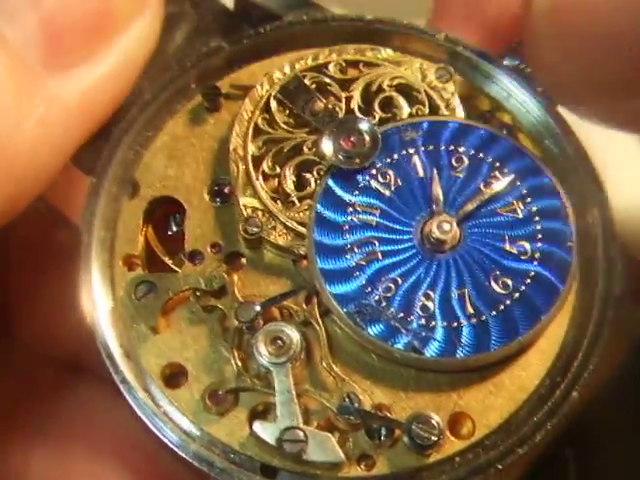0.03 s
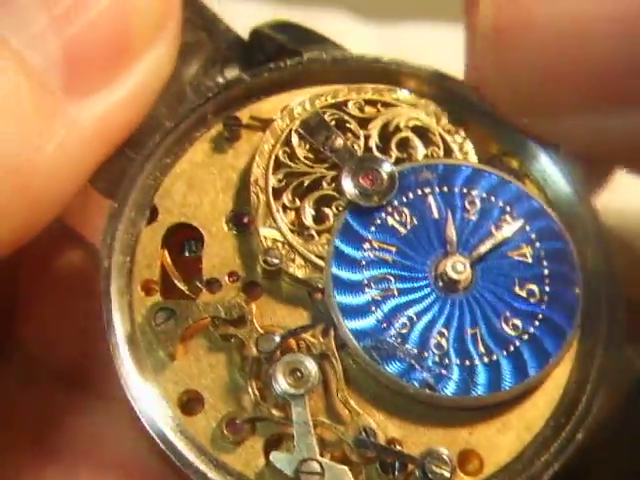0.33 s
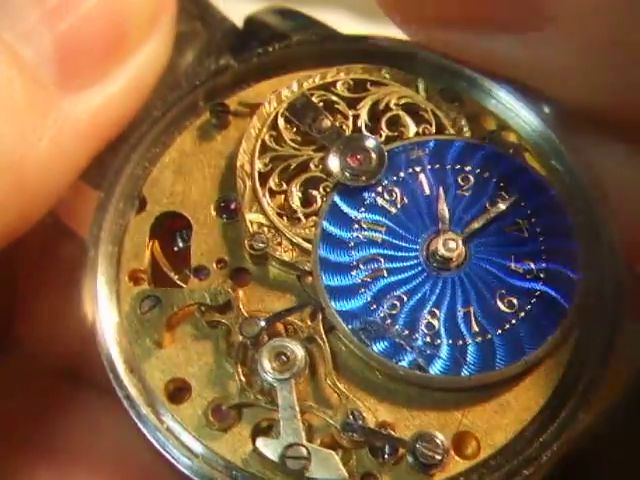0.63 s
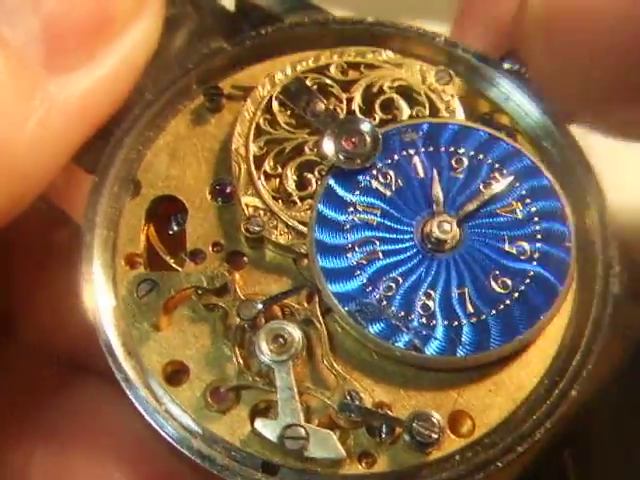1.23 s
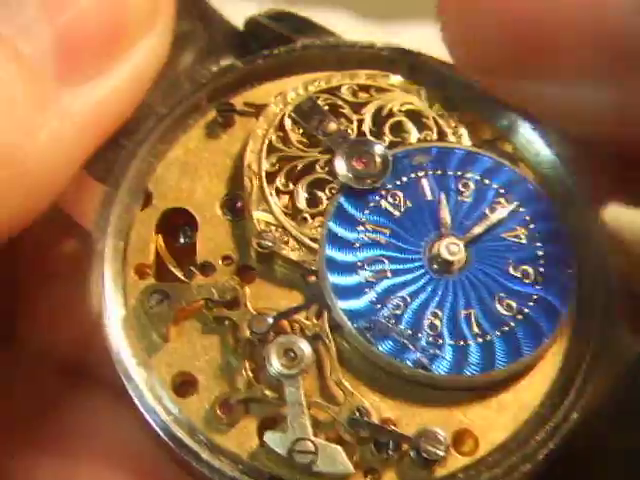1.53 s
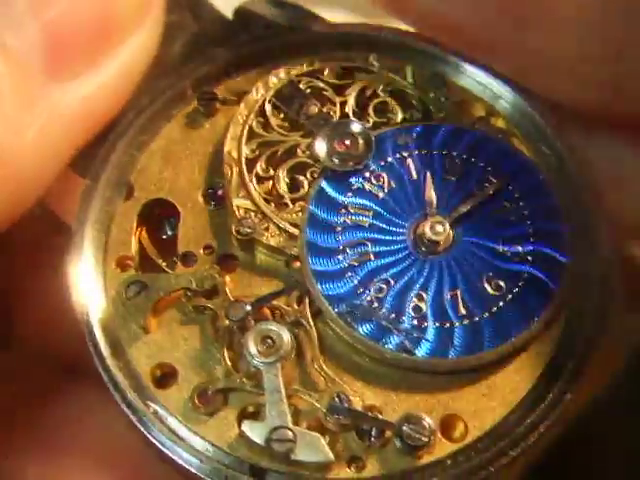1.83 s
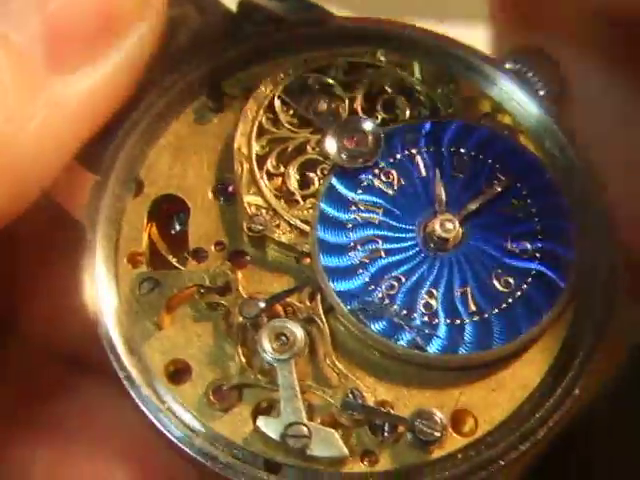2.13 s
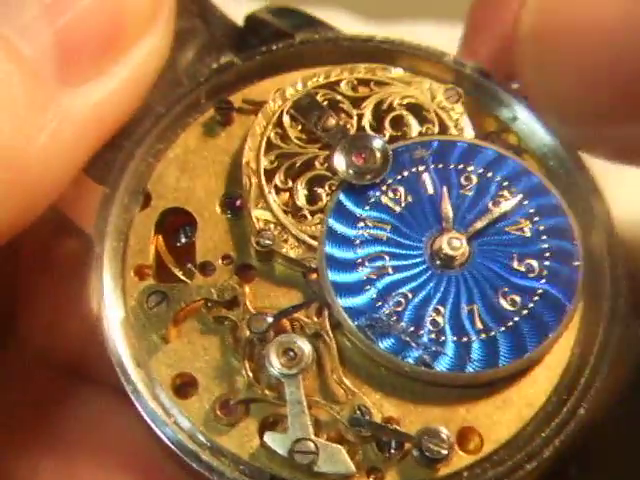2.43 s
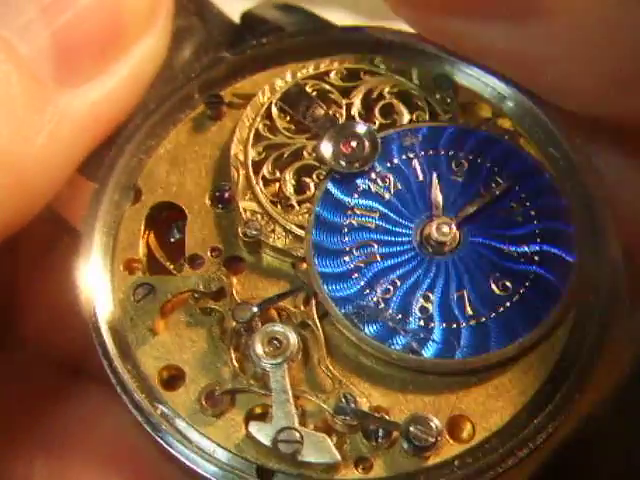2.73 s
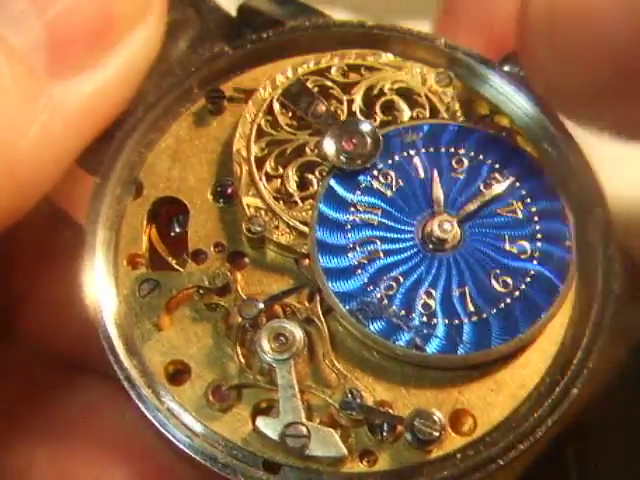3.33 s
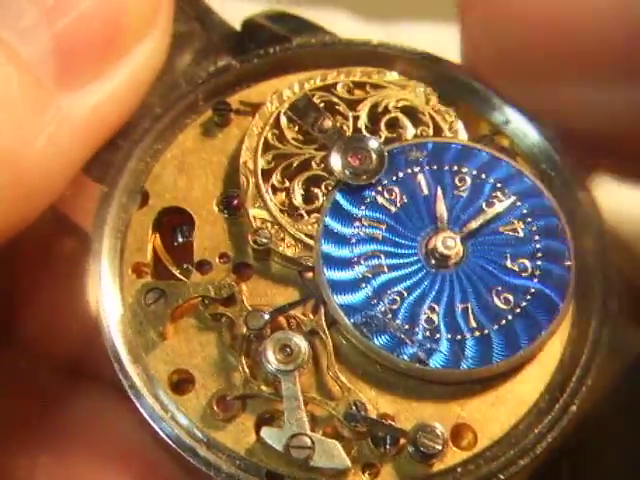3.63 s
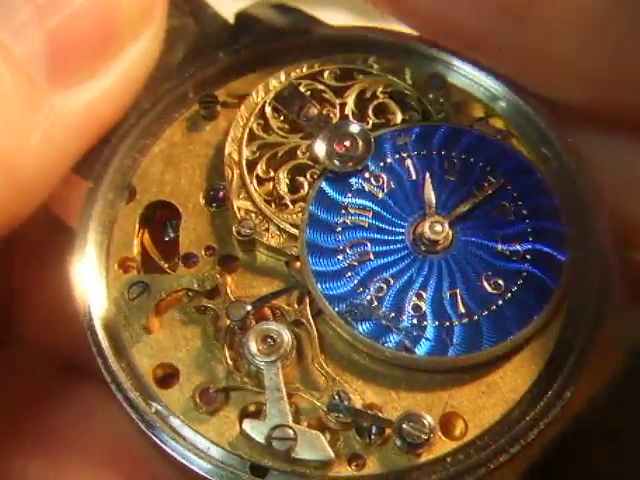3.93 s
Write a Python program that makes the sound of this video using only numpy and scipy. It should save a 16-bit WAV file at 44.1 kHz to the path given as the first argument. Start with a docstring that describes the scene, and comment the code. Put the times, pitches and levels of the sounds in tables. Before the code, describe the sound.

A watch is wound by hand, close to the microphone in a quiet room. Four bursts of quick, bright metal clicks come with short pauses, and one dry snap follows the third. A faint gritty hiss lies underneath.

```python
"""Winding a watch, close up

A quiet room, the watch close to the microphone. Four turns of the crown drag the pawl over the ratchet
wheel, each tooth a short metal click that rings movement and case. The crown swishes back before the
first two turns, and a finger rubs softly between them; the pawl snaps home faintly after the second,
clearly after the third. The room hums and rumbles, and the recorder's coarse steps add a gritty hiss."""
import sys
import numpy as np
from scipy import signal
from scipy.fft import rfft, irfft, next_fast_len
from scipy.io import wavfile
from scipy.ndimage import map_coordinates

SR = 44100
rng = np.random.default_rng(int(sys.argv[2]) if len(sys.argv) > 2 else 0)


def digitize_waveform(pressure):
    """Quantize a signal to 16-bit integers and store it at the path in sys.argv[1].

    Rows of a 2-D input are taken as channels; values are limited to [-1, 1].
    """
    field = np.atleast_2d(pressure).T
    bounded = np.clip(field, -1, 1)
    quanta = np.round(bounded * 32767).astype(np.int16)
    wavfile.write(sys.argv[1], SR, quanta)


N = 176400  # 4 s
ATTACK_S = 0.0008  # rise of a metal contact


def amp(db):
    """Decibels to gain."""
    return 10 ** (np.asarray(db) / 20)


def unit(x):
    """Scale to rms 1."""
    return x / np.sqrt(np.mean(x ** 2) + 1e-20)


def along(points, hz):
    """Read (Hz, value) points on a log frequency axis."""
    knots_hz, values = np.transpose(points)
    return np.interp(np.log(hz + 1), np.log(knots_hz + 1), values)


def filtered(x, response):
    """Filter x by a gain given as a function of Hz."""
    size = next_fast_len(len(x) + SR // 4)
    return irfft(rfft(x, size) * response(np.fft.rfftfreq(size, 1 / SR)), size)[:len(x)]


def noise(spectrum):
    """Noise of rms 1, coloured by (Hz, dB) points."""
    return unit(filtered(rng.standard_normal(N), lambda hz: amp(along(spectrum, hz))))


def wobble(rate):
    """A smooth random curve, rate knots a second."""
    return map_coordinates(rng.standard_normal(int(N * rate / SR) + 4), [np.arange(N) * rate / SR])


def rise(t):
    """The quick swell at the start of a contact."""
    return 1 - np.exp(-(t / ATTACK_S) ** 4)


def fade(t, t60):
    """Exponential decay by 60 dB in t60 seconds."""
    return np.exp(-np.log(1000) * t / t60)


def background():
    """Machine hum, a swelling, droning rumble and room air, with a soft finger rub near 1.3 s."""
    # Each row: frequency in Hz, rms level in dB (for the drone, relative to the rumble).
    hum_tones = [(15.5, -64), (31, -58.5), (46.5, -70), (71.6, -68.5), (77.4, -72.5), (120, -72.5),
                 (142.4, -71.5)]
    drone_tones = [(171, -3), (293, -10.5)]
    # Noise colours. Each row: frequency in Hz, relative density in dB.
    air_colour = [(20, -2), (35, -0.5), (60, -6), (110, -6.5), (200, -4.5), (350, -7.5), (700, -12),
                  (1300, -19), (2500, -22.5), (8500, -25), (10500, -60.5)]
    rumble_colour = [(60, -28.5), (130, -13), (172, -1.5), (215, -3), (290, 0), (380, -18), (800, -30.5)]
    # Swell and ebb. Each row: time in seconds, level in dB.
    air_and_finger_rub_levels = [(0, -54.5), (.8, -60), (1.3, -56), (2, -60), (3, -61), (4, -61.5)]
    rumble_levels = [(0, -75.5), (1.0, -72.5), (1.6, -70.5), (1.85, -64), (2.3, -60.5), (2.6, -59.5),
                     (2.85, -67.5), (3.0, -64), (3.2, -68), (3.5, -62.5), (4, -72.5)]
    waver_db = 3
    t = np.arange(N) / SR
    tone = lambda hz, db: amp(db) * np.sqrt(2) * np.sin(2 * np.pi * (hz * t + rng.random()))
    level = lambda curve: amp(np.interp(t, *np.transpose(curve)))
    hum = sum(tone(hz, db) for hz, db in hum_tones)
    air_and_rub = level(air_and_finger_rub_levels) * noise(air_colour)
    rumble = noise(rumble_colour)
    drone = sum(tone(hz, db + waver_db * wobble(rate=7)) for hz, db in drone_tones)
    return hum + level(rumble_levels) * (rumble + drone) + air_and_rub


def crown_slides():
    """A thin swish as the crown slides back under the fingertip."""
    # Each row: start in seconds, length in seconds, level at the crest in dB.
    slides = [(0.0, 0.38, -65.5), (1.194, 0.19, -72.5)]
    # Each row: frequency in Hz, relative density in dB.
    swish_colour = [(2000, -36), (6000, -2), (7000, -5), (7600, 6.5), (8500, -9), (10500, -60)]
    t = np.arange(N) / SR
    level = sum(amp(db) * np.sin(np.pi * np.clip((t - start) / length, 0, 1))
                for start, length, db in slides)
    return level * noise(swish_colour)


def ratchet():
    """Each tooth scrapes past the pawl, which falls, bounces and rings movement and case."""
    # Each row: start in seconds, level in dB before click_db, then the energy shares in dB
    # aimed at for the plate, middle and top bands.
    teeth = [(0.3538, -32.5, -14, -9, -6), (0.3894, -36.0, -10, -5, -13), (0.4472, -34.0, -13, -8, -9),
             (0.4797, -34.5, -11, -9, -10), (0.5136, -34.0, -12, -8, -11), (0.5566, -34.5, -11, -8, -8),
             (0.6029, -33.0, -13, -8, -7), (0.6539, -33.0, -15, -10, -8), (0.7111, -33.0, -17, -10, -14),
             (0.7702, -33.0, -16, -11, -17), (0.8216, -33.0, -18, -9, -9), (0.8621, -31.5, -17, -8, -7),
             (0.9178, -32.0, -18, -5, -13), (1.5317, -33.5, -19, -4, -13), (1.554, -32.5, -21, -6, -9),
             (1.5806, -33.5, -19, -8, -16), (1.6068, -33.5, -17, -10, -17), (1.6434, -31.5, -21, -7, -20),
             (1.6809, -33.0, -18, -7, -19), (1.7168, -30.5, -17, -8, -7), (1.7542, -30.5, -20, -8, -8),
             (1.7945, -31.5, -15, -9, -9), (1.8386, -33.5, -14, -8, -13), (1.8808, -32.0, -16, -8, -18),
             (1.9239, -31.0, -17, -8, -6), (1.9757, -32.0, -15, -7, -9), (2.0513, -35.0, -14, -4, -14),
             (2.6269, -32.0, -16, -7, -8), (2.6521, -31.5, -15, -11, -9), (2.6729, -33.5, -12, -11, -7),
             (2.7016, -32.5, -16, -12, -16), (2.732, -35.5, -14, -7, -14), (2.7646, -35.0, -13, -5, -14),
             (2.7982, -35.0, -15, -8, -14), (2.8298, -35.5, -12, -6, -10), (2.8666, -32.0, -15, -10, -8),
             (2.9045, -33.0, -15, -10, -14), (2.9438, -35.5, -11, -8, -12), (2.9798, -34.5, -16, -9, -5),
             (3.0226, -34.5, -15, -8, -17), (3.093, -32.5, -11, -10, -8), (3.7105, -33.5, -10, -9, -11),
             (3.7249, -34.0, -11, -8, -17), (3.7443, -33.0, -12, -10, -9), (3.7738, -31.5, -13, -11, -10),
             (3.8059, -35.0, -14, -13, -13), (3.8339, -33.5, -16, -14, -10), (3.8663, -32.5, -16, -13, -17),
             (3.9013, -31.0, -16, -14, -6), (3.9341, -34.0, -16, -8, -15), (3.972, -32.5, -19, -9, -8)]
    # Modes damped by the hand. Each row: frequency in Hz, relative level in dB, t60 in seconds.
    movement_modes = [(2380, -13, .006), (2709, -15.5, 0.0067), (3210, -20, .006), (3760, -10, .009),
                      (3986, -11, .008), (4705, -9, 0.0044), (5370, -7.5, .008), (5930, -1.5, .008),
                      (6390, -1.5, .007), (6608, -4.5, 0.01), (7108, -3.5, .009), (7495, 2, 0.0088),
                      (8025, 1.5, 0.0055)]
    # The steel case rings faintly and longer. Each row: frequency in Hz, relative level in dB.
    case_modes = [(5380, -3.5), (5790, -2), (6280, 1.5), (6520, 2.5), (6640, 2), (7130, 0), (7720, -4.5)]
    # Each row: typical delay in seconds, level in dB relative to the pawl's first fall.
    rebounds = [(.0012, -12.5), (.0033, -20)]
    click_db, scrape_db, case_db = -13, -6, -34
    scrape_t60_s, case_t60_s = 0.0075, 0.09
    scatter_db, scatter_rad, delay_scatter = 0.5, 0.8, 0.1  # change from tooth to tooth
    out, t = np.zeros(N + SR), np.arange(SR // 8) / SR
    mode_hz, mode_db, mode_t60 = np.transpose(movement_modes)[:, :, None]
    case_hz, case_mode_db = np.transpose(case_modes)[:, :, None]
    grit = noise([(300, -27), (1000, -27), (1850, -19.5), (2400, -7), (3300, -12), (4300, -4.5),
                  (5000, -9.5), (6200, 0), (8800, 1.5), (10500, -55)])  # The scrape's colour. Each row: frequency in Hz, relative dB.
    for start, level_db, *shares_db in teeth:
        gain, phase = rng.standard_normal((2, len(mode_hz), 1))
        swing = np.sin(2 * np.pi * mode_hz * (t - ATTACK_S) + scatter_rad * phase)
        movement = np.sum(amp(mode_db + scatter_db * gain) * fade(t, mode_t60) * swing, axis=0)
        case_swing = np.sin(2 * np.pi * (case_hz * t + rng.random(case_hz.shape)))
        case = np.sum(amp(case_db + case_mode_db) * case_swing, axis=0) * fade(t, case_t60_s)
        scrape = np.roll(grit, -round(start * SR))[:len(t)] * fade(t, scrape_t60_s)
        fall = unit(rise(t) * (movement + case)) + amp(scrape_db) * unit(rise(t) * scrape)
        click = fall.copy()
        for delay, bounce_db in rebounds:
            lag = round(delay * SR * np.exp(delay_scatter * rng.standard_normal()))
            click += amp(bounce_db) * np.roll(fall, lag)
        out[round(start * SR):][:len(t)] += amp(level_db + click_db) * radiated(click, *shares_db)
    return out[:N]


def radiated(click, plate_db, middle_db, top_db):
    """Tilt a click toward its band shares, the treble taking the rest, and thin its bass; rms 1."""
    # Plate, middle, treble and top band. Each row: lower edge in Hz, upper edge in Hz.
    bands = [(2000, 3400), (3500, 5600), (5700, 7600), (7700, 9000)]
    radiate_hz = 1700  # so small a body radiates little below this
    hz, power = np.fft.rfftfreq(len(click), 1 / SR), np.abs(rfft(click)) ** 2
    energy = np.array([power[(hz > low) & (hz < high)].sum() for low, high in bands])
    treble_share = max(1 - np.sum(amp([plate_db, middle_db, top_db]) ** 2), 0.1)
    shares_db = np.array([plate_db, middle_db, 10 * np.log10(treble_share), top_db])
    tilt = np.transpose([np.mean(bands, axis=1), shares_db - 10 * np.log10(energy)])
    bass_cut = lambda f: 1 / np.sqrt(1 + (radiate_hz / (f + 1)) ** 4)
    return unit(filtered(click, lambda f: amp(along(tilt, f)) * bass_cut(f)))


def pawl_snaps():
    """When the crown is let go the pawl hits its stop: a dry, fuller crack."""
    # Each row: start in seconds, level in dB, t60 in seconds, treble shelf in dB.
    snaps = [(2.145, -54.5, .024, -8.5), (3.1985, -39.5, 0.0097, -1.5)]
    # Each row: frequency in Hz, relative density in dB.
    crack_colour = [(300, -27), (800, -25), (1180, -10.5), (1700, -13), (2100, -5.5), (2450, 1.5),
                    (2900, 0), (3700, -0.5), (4400, -5.5), (4900, -14), (5400, -1), (5950, 3), (6400, -7.5),
                    (7000, 2), (7500, 3), (8500, -4), (10500, -60)]
    middle_hz, treble_hz = 4700, 6900  # a soft snap loses its treble between these
    out, t = np.zeros(N + SR), np.arange(SR // 8) / SR
    for start, level_db, t60, treble_db in snaps:
        burst = rng.standard_normal(len(t)) * rise(t) * fade(t, t60)
        shelf = [(middle_hz, 0), (treble_hz, treble_db)]
        crack = filtered(burst, lambda hz: amp(along(crack_colour, hz) + along(shelf, hz)))
        out[round(start * SR):][:len(t)] += amp(level_db) * unit(crack)
    return out[:N]


def reverb(x, level_db, t60_s):
    """The short answer of a small room."""
    t = np.arange(SR // 4) / SR
    tail = rng.standard_normal(len(t)) * fade(t, t60_s)
    return amp(level_db) * signal.fftconvolve(x, tail / np.linalg.norm(tail))[:N]


def scene():
    """One microphone close on the watch, the quiet room well behind it."""
    watch = ratchet() + pawl_snaps() + crown_slides()
    return (watch + reverb(watch, level_db=-18.5, t60_s=0.16) + background())[None]


def record(dry):
    """The recorder rounds to coarse steps at half the sample rate, then cuts the top."""
    # The recorder's treble loss. Each row: frequency in Hz, gain in dB.
    roll_off = [(7600, -0.5), (8100, -1), (8380, -7), (8800, -17.5), (9150, -37.5)]
    step, top_hz = amp(-44), 9566
    stepped = np.zeros(N)
    stepped[::2] = 2 * step * (np.floor(dry[0, ::2] / step) + 0.5)  # doubled for the empty samples
    return filtered(stepped, lambda hz: amp(along(roll_off, hz)) * (hz < top_hz))[None]


dry = scene()
out = record(dry)
digitize_waveform(out)
```